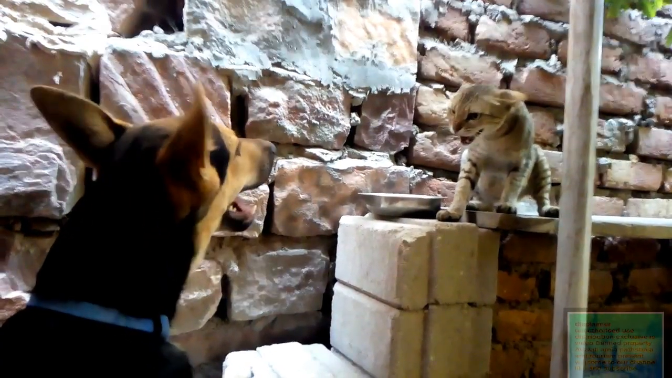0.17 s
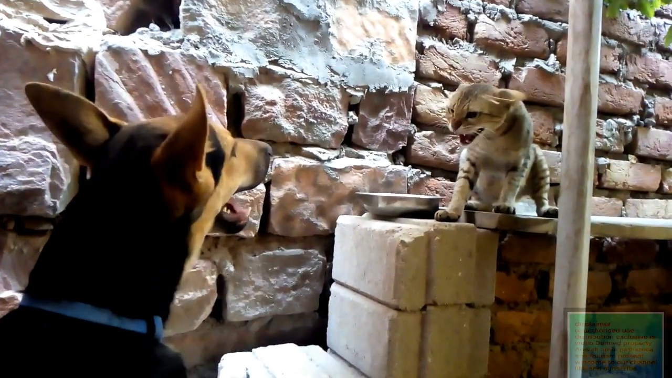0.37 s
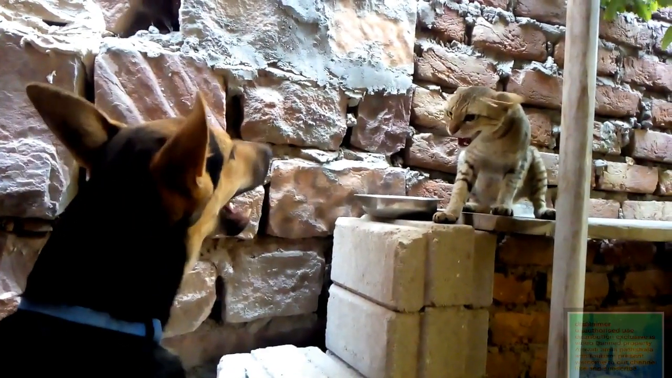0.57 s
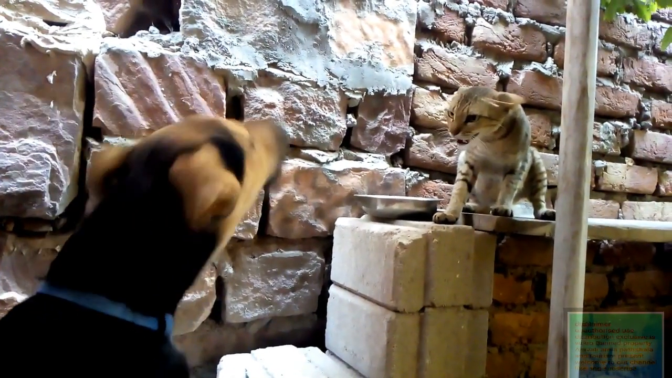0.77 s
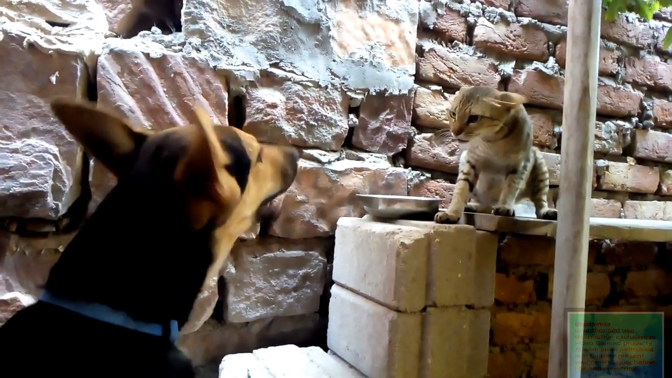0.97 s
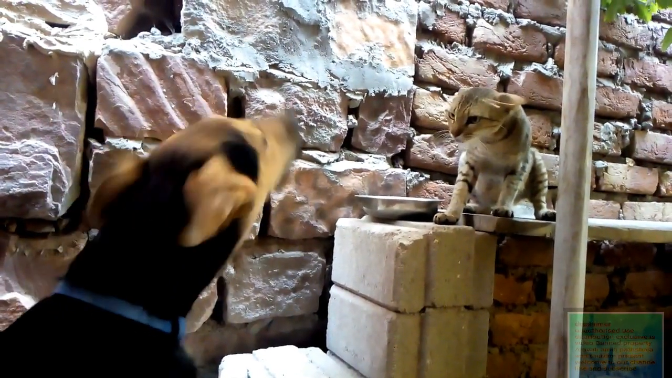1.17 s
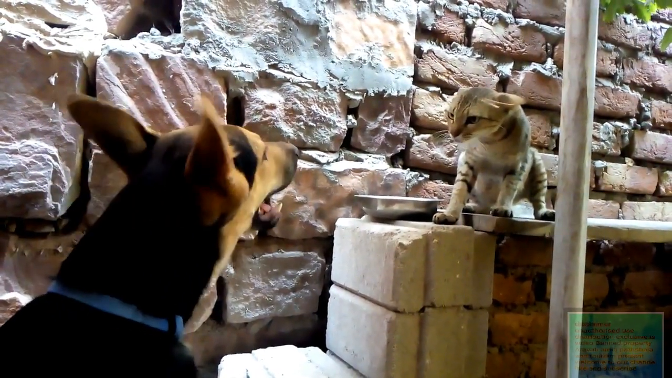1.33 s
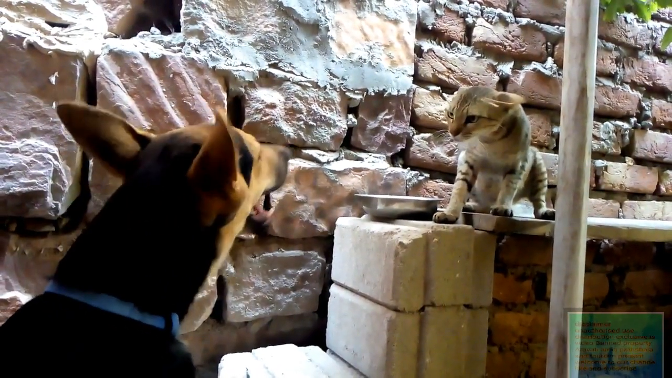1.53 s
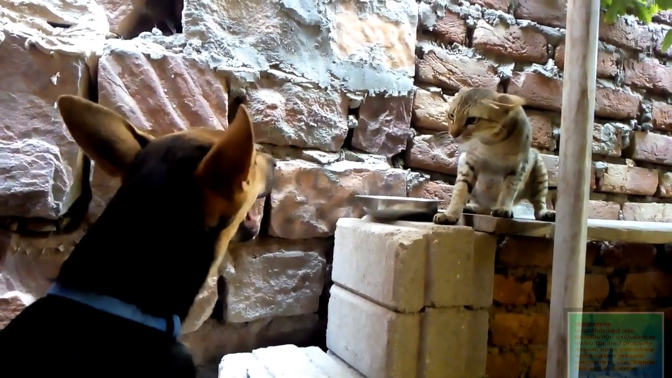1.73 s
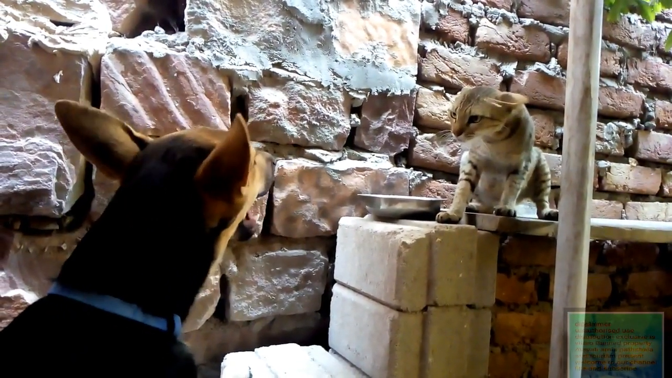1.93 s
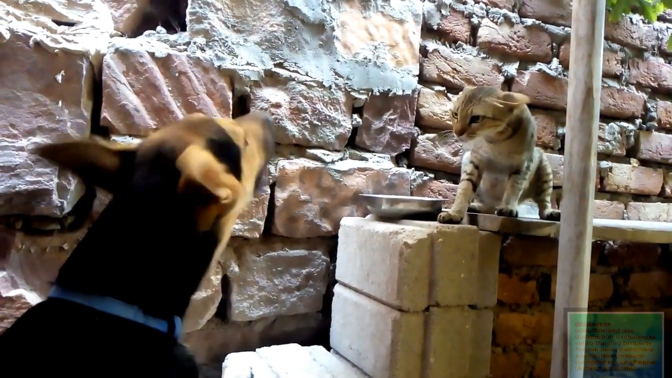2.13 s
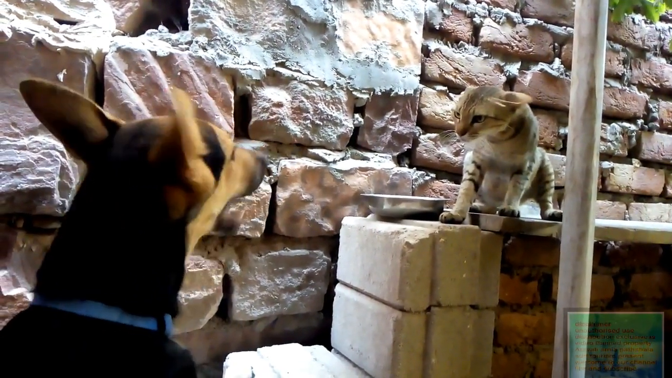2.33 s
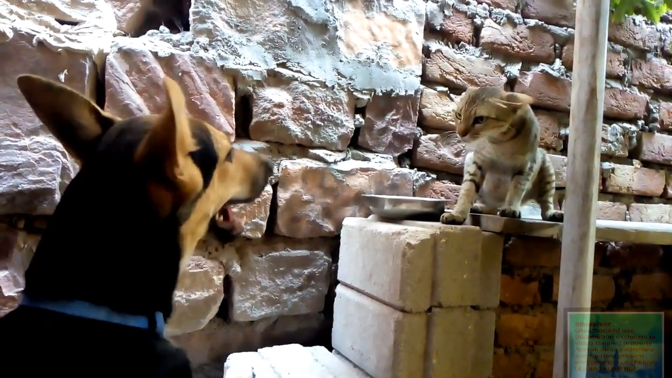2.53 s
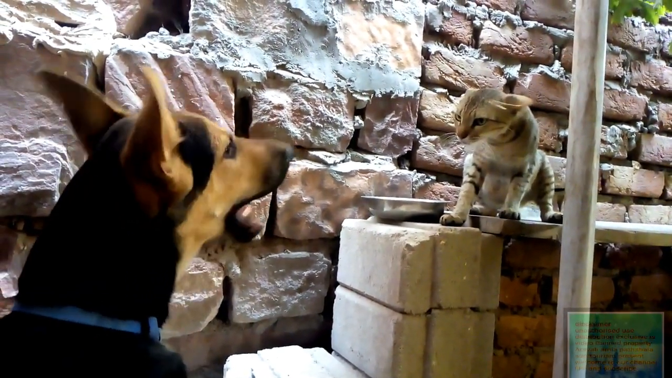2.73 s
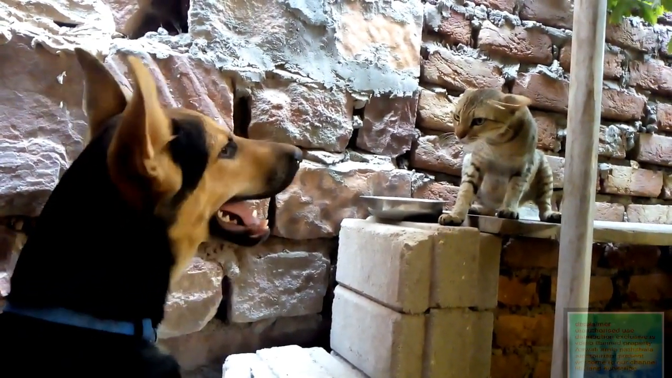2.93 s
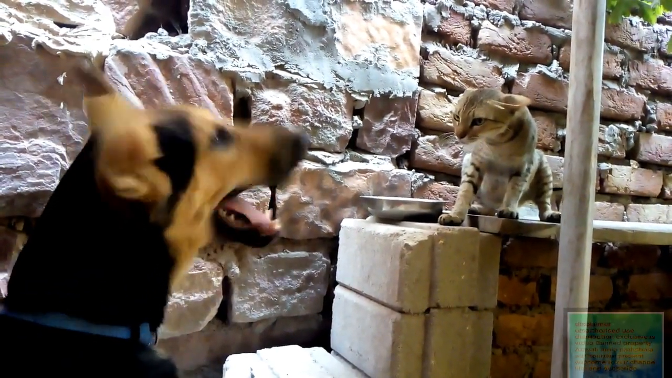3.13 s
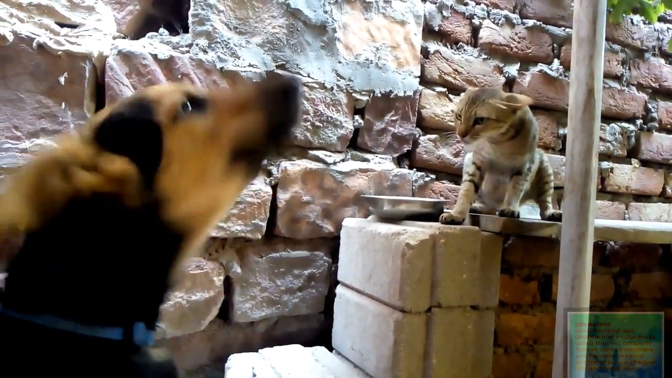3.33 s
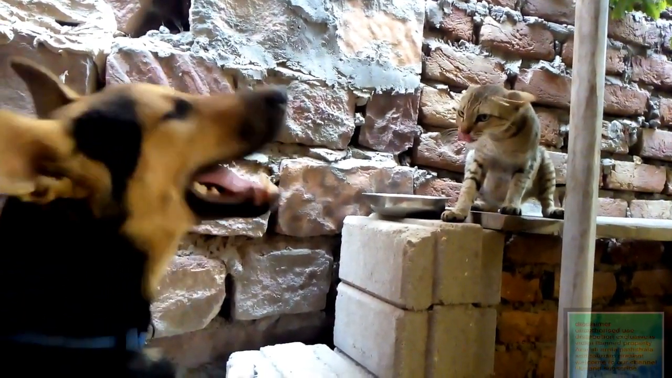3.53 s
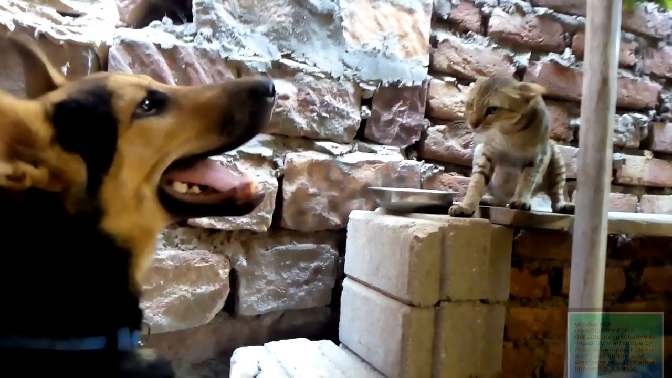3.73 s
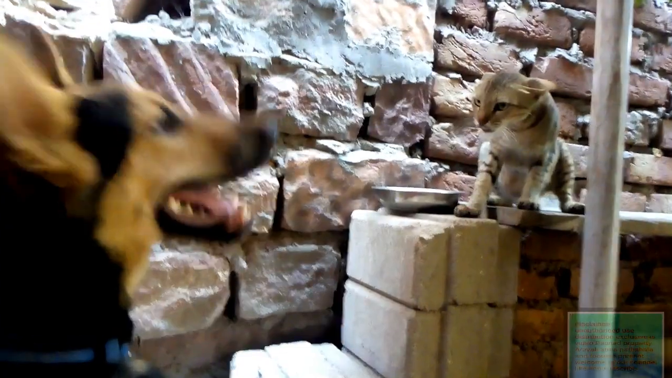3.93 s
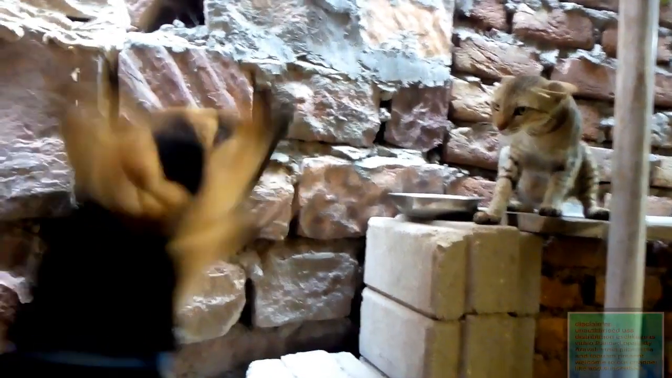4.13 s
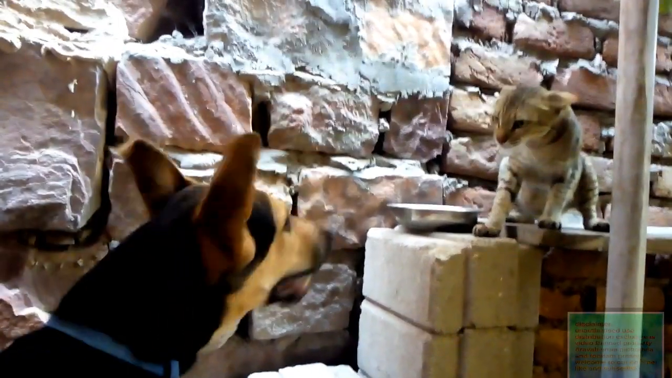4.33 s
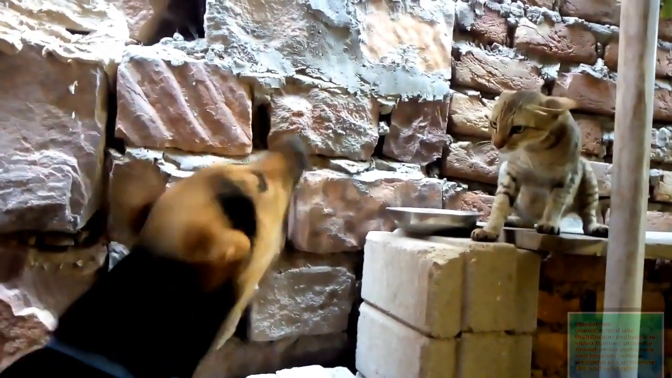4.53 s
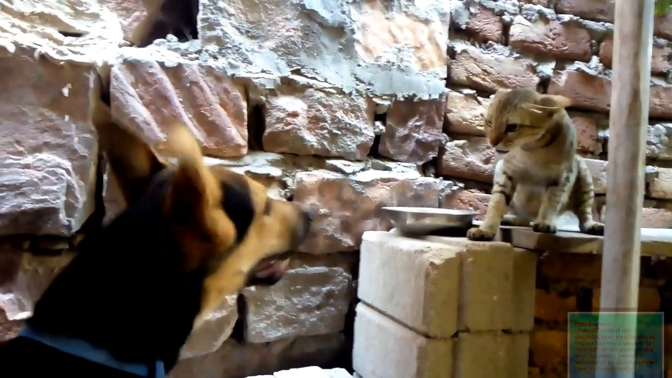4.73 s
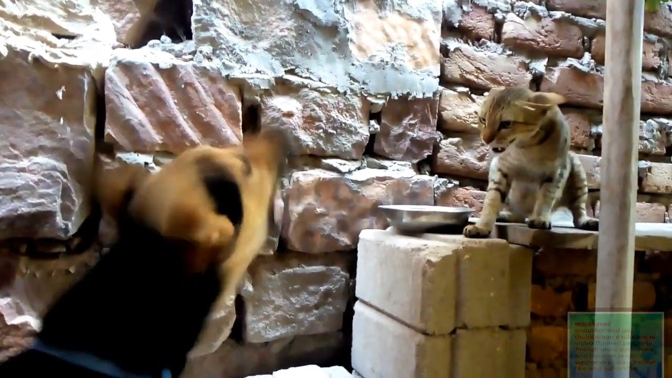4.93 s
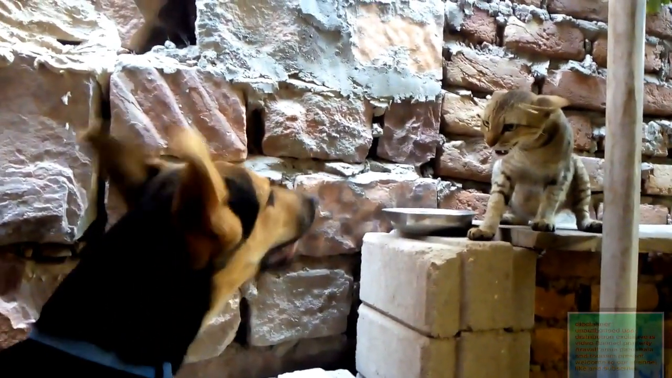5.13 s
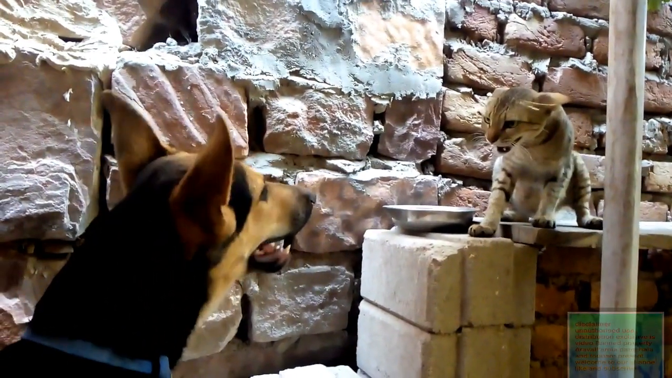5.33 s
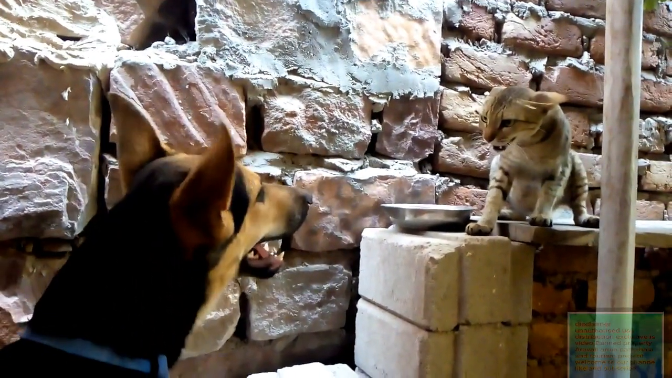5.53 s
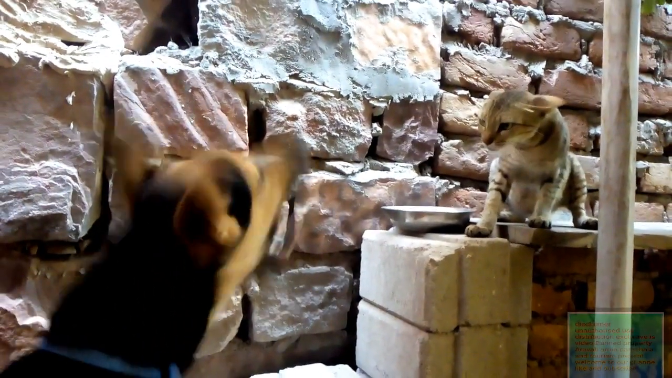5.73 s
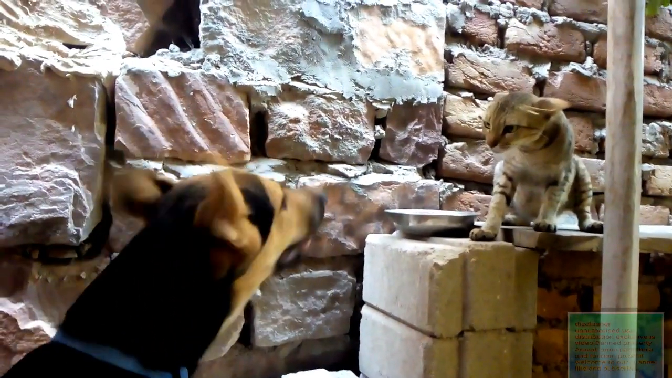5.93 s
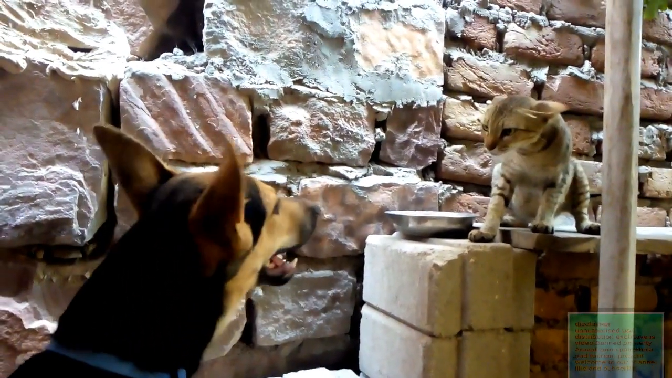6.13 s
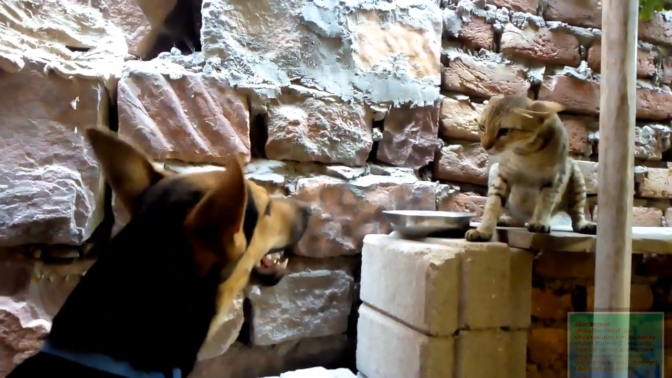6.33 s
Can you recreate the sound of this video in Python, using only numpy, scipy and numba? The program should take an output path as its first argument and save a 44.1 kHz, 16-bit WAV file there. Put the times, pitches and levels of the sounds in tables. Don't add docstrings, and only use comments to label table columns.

```python
import sys
import numpy as np
from scipy import signal
from scipy.fft import rfft, irfft
from scipy.io import wavfile
from scipy.ndimage import uniform_filter1d
from numba import njit

SR = 44100
rng = np.random.default_rng(int(sys.argv[2]) if len(sys.argv) > 2 else 0)


def elevation(decibels):
    levels = np.asarray(decibels, float)
    return 10 ** (levels / 20)


def persist_wave(psi):
    counts = np.round(np.clip(psi, -1, 1) * 32767).astype(np.int16)
    wavfile.write(sys.argv[1], SR, np.atleast_2d(counts).T)


N = 281358


def steep(x, hz, kind="low", order=4):
    return signal.sosfilt(signal.butter(order, hz, kind, fs=SR, output="sos"), x)


def rms_one(x):
    return x / np.sqrt(np.mean(x ** 2) + 1e-20)


def in_time(rows, t):
    s, *columns = np.transpose(rows)
    return [np.interp(t, s, c) for c in columns]


def at_hz(points, hz):
    points = np.array(points)
    return np.interp(np.log(hz), np.log(points[:, 0]), points[:, 1])


def wobble(size, hz):
    return rms_one(steep(rng.standard_normal(size + 4000), hz, order=2)[4000:])


def coloured(spectrum):
    # pitch_hz, likeness (0-1)
    likeness = [(60, 1), (300, 0.64), (640, 0.15), (1400, 0.096), (15000, 0)]
    hz = np.fft.rfftfreq(N, 1 / SR) + 1
    alike = np.clip(at_hz(likeness, hz), 0, 1)
    mid, side = rfft(rng.standard_normal((2, N))) * elevation(at_hz(spectrum, hz))
    return rms_one(irfft(np.sqrt(1 + alike) * mid + np.sqrt(1 - alike) * side * [[1], [-1]], N))


@njit
def resonate(x, hz, width_hz, rate):
    r = np.exp(-np.pi * width_hz / rate)
    y = np.zeros(len(x))
    for i in range(2, len(x)):
        drive = (1 - r * r) / 2 * (x[i] - x[i - 2])
        y[i] = drive + 2 * r * np.cos(2 * np.pi * hz[i] / rate) * y[i - 1] - r * r * y[i - 2]
    return y


def cavities(x, modes):
    out = np.zeros(len(x))
    for k, (hz, width_hz, level_db) in enumerate(modes):
        out += (-1) ** k * elevation(level_db) * resonate(x, np.full(len(x), 1. * hz), 1. * width_hz, SR)
    return out


def outdoor_hum():
    # pitch_hz, level_db (per Hz)
    hum_colour = [(25, -24.5), (45, -3.5), (130, 3), (180, -3), (275, -5.5), (615, -14.5), (930, -18.5),
                  (1100, -22.5), (2300, -24.5), (3300, -27), (6000, -34.5), (15500, -47)]
    # time_s, level_db
    hum_level = [(0, -58.5), (.5, -56), (1.5, -59), (3, -57.5), (3.7, -62.5), (5.3, -60), (6.38, -61)]
    level_db = in_time(hum_level, np.arange(N) / SR)[0]
    return elevation(level_db + 1.5 * wobble(N, 17)) * coloured(hum_colour)


def panting():
    # start_s, length_s, rise_share, level_db, nostril_hiss_db
    pants = [
        (0.05, 0.93, 0.039, -59.5, -100),
        (0.183, 0.43, 0.54, -68, -64.5),
        (1.658, 0.55, 0.061, -61.5, -94),
        (2.352, 0.06, .2, -60, -88),
        (3.751, 0.22, 0.28, -66, -61.5),
        (5.36, 0.25, 0.17, -58, -93),
        (6.349, 0.14, 0.2, -48, -64),
    ]
    # pitch_hz, level_db (per Hz)
    breath_colour = [(200, -13), (500, 12.5), (1200, 6), (2500, 1.5), (4000, -25), (7000, -27.5),
                     (9000, -43.5), (16000, -52.5)]
    t = np.arange(N) / SR
    air = coloured(breath_colour)
    hiss = rms_one(steep(steep(air, 4200, "high"), 8200))
    puffs = np.zeros((2, N))
    for start_s, length_s, rise, level_db, hiss_db in pants:
        peak_s = start_s + np.clip(rise, .05, .95) * length_s
        puff = np.interp(t, [start_s, peak_s, start_s + length_s], [0, 1, 0])
        puffs += puff * (elevation(level_db) * air + elevation(hiss_db) * hiss)
    return elevation(0.84 * wobble(N, 24)) * puffs


def voicing(curve, rough, chest_mouth, head_mouth, chest_throat_db, head_throat_db, rasp_db):
    register_hz = [510, 610]
    t = np.arange(curve[0][0], curve[-1][0], .001)
    since_s = t - t[0]
    share = since_s / (t[-1] - t[0])
    pitch, effort_db = in_time(curve, t)

    held_db = 20 * np.log10(uniform_filter1d(elevation(effort_db), size=int(0.023 * 1000) + 1))
    ring_on_db = .9 * np.clip(held_db - effort_db, -10, 20) * (share > .25) * (share < .85)

    climbing = np.interp(np.maximum.accumulate(pitch), register_hz, [.55, 1])
    roughness = climbing * np.interp(share, [.2, .4, 1], [.1, rough, 1.2 * rough])
    mouth_hz = pitch * np.interp(pitch, register_hz, [chest_mouth, head_mouth])
    throat_db = np.interp(pitch, register_hz, [chest_throat_db, head_throat_db])
    throat_db += np.interp(since_s, [0, 0.019], [-18.5, 0])
    rasp_swell_db = np.interp(since_s, [0, 0.06, 1.06], [-16, 0, -107.5])
    return np.transpose([t, pitch, effort_db, roughness, mouth_hz,
                         throat_db + ring_on_db, rasp_db + ring_on_db + rasp_swell_db])


def bark(rows, chest_hz, tongue_hz, tongue_db):
    # pitch_hz, width_hz, level_db
    throat = [(2089, 290, 3), (2432, 450, 2.5), (2727, 545, -1)]
    # pitch_hz, width_hz, level_db
    rasp = [(4000, 8100, -2), (6040, 3200, -23.5), (12000, 5200, -34)]
    mouth_width_hz, tongue_width_hz, muzzle_cut_hz = 463., 190, 2860
    first = int(rows[0][0] * SR)
    t = np.arange(first, int(rows[-1][0] * SR)) / SR
    pitch, effort_db, rough, mouth_hz, throat_db, rasp_db = in_time(rows, t)
    rough = np.clip(rough, 0, 1)

    shake = wobble(SR // 2, 130)[:len(t)]
    flutter = wobble(SR // 2, 110)[:len(t)]
    air = rng.standard_normal(SR // 2)[:len(t)]
    phase = 2 * np.pi * np.cumsum(pitch * (1 + .12 * rough * shake)) / SR
    k = np.arange(1, 31)[:, None]
    pulses = np.sum(np.cos(k * phase) * (k * pitch < .4 * SR), axis=0)
    pulses *= 1 + 0.95 * rough * flutter
    breath = 2.0 * np.sqrt(SR / 4 / pitch) * air * (.6 + 0.91 * np.cos(phase))
    source = (1 - rough) * pulses + rough ** 1.073 * breath

    detune = (k * pitch / mouth_hz - mouth_hz / (k * pitch)) * mouth_hz / mouth_width_hz
    even = np.sqrt(np.sum(1 / (1 + detune ** 2) ** 2, axis=0))
    once = resonate(source, mouth_hz, mouth_width_hz, SR)
    twice = resonate(once, mouth_hz, mouth_width_hz, SR)
    voice = (0.6 * twice + 0.32 * once) / even
    upper = [(tongue_hz, tongue_width_hz, tongue_db / 2)] + throat
    voice -= elevation(throat_db) * cavities(cavities(source, upper), upper)
    voice = steep(voice, muzzle_cut_hz, order=6)
    voice += elevation(rasp_db) * steep(cavities(source + 0.074 * breath, rasp), 5500, order=2)

    out = np.zeros(N)
    fade = np.clip((t[-1] - t) / .008, 0, 1)
    out[first:][:len(t)] = elevation(effort_db + 5) * voice * fade
    return steep(out, chest_hz, "high", order=2)


def barking_dog():
    # time_s, pitch_hz, effort_db
    yelps = [
        [(.518, 404.3, -54.5), (.533, 431.1, -33.5), (.536, 440, -23.5), (.545, 475, -19.5), (.565, 599, -13),
         (.585, 741.4, -7), (.61, 710, -4.5), (.645, 648.2, -9.5), (.67, 681, -37)],
        [(.943, 401, -47), (.953, 411.2, -22.5), (.965, 520, -20.5), (.997, 627.6, -7.5), (1.02, 668.8, -7),
         (1.058, 648, -7.5), (1.07, 621, -19), (1.09, 569, -52)],
        [(3.068, 421.8, -34.5), (3.085, 448.6, -23.5), (3.1, 469.4, -11.5), (3.112, 674.8, -28.5),
         (3.13, 808, -7), (3.155, 816.2, -11.5), (3.182, 751.7, -7), (3.19, 429, -23.5), (3.225, 421, -31.5)],
        [(5.608, 420.6, -48), (5.612, 412.8, -41.5), (5.622, 399.2, -63.5), (5.632, 419.8, -24.5),
         (5.648, 525.7, -17), (5.666, 766.8, -13.5), (5.71, 753.2, -5.5), (5.745, 645, -11),
         (5.765, 640, -28.5)],
    ]
    # time_s, pitch_hz, effort_db
    cracks = [
        [(4.029, 429, -36.5), (4.05, 463.3, -12.5), (4.07, 461.3, -19.5), (4.092, 482.7, -11),
         (4.106, 507.4, -15), (4.122, 621, -6.5), (4.14, 734, -12.5), (4.16, 717, -53.5)],
        [(4.402, 271.7, -34), (4.428, 337.7, -20), (4.44, 383.3, -29), (4.452, 424.2, -18),
         (4.47, 485.6, -13.5), (4.482, 500.6, -28.5), (4.486, 640.7, -5.5), (4.52, 623, -13.5),
         (4.538, 646, -46)],
        [(4.806, 282.8, -40), (4.823, 303, -14.5), (4.836, 346.9, -24.5), (4.852, 415.4, -16.5),
         (4.88, 497.2, -14.5), (4.887, 629, -5), (4.912, 652.2, -8.5), (4.94, 601, -20.5), (4.955, 557, -33)],
    ]
    # time_s, pitch_hz, effort_db
    grumbles = [
        [(1.969, 419.4, -32), (1.988, 440.2, -15), (2.01, 596.3, -21.5), (2.042, 620, -10.5),
         (2.056, 458, -20.5), (2.075, 422, -18.5), (2.15, 262.7, -25), (2.19, 140, -37.5), (2.32, 128, -61)],
        [(2.601, 371, -46.5), (2.615, 382.2, -27), (2.635, 398.7, -26.5), (2.66, 399.3, -23),
         (2.685, 363, -28.5), (2.72, 338, -53.5)],
    ]
    roughness = [.28, .05, .04, .3, .55, .3, .3, .26, .2]
    # mouth resonance over pitch in chest voice, in head voice,
    # chest_throat_db, head_throat_db, rasp_db
    manners = [(1.4, 1.04, -6.5, -11.5, -35), (0.76, .97, -5.5, -11, -36.5), (1.7, 1.04, -11.5, -8, -32),
               (1.25, 1.03, -4.5, -10, -29.5), (1.7, 1.02, -6.5, -11, -29), (1.8, 1.02, -0.5, -8, -26.5),
               (2.05, 0.87, -2.5, -16, -30.5), (1.746, 1.5, -13.5, -37, -36.5), (2.02, 1.9, -9, -7, -42)]
    # thrown_at_walls_db, chest_cutoff_hz, tongue_hz, tongue_db
    poses = [
        (0, 110, 1600, 2),
        (1, 150, 1980, 9),
        (1, 400, 1437, 8.5),
        (0.5, 190, 1370, 4.5),
        (0.5, 320, 1450, 7),
        (0.5, 380, 1300, 4.5),
        (0.5, 460, 1400, 2),
        (-27, 45, 4000, -4),
        (-38, 99, 1190, 10.5),
    ]
    barks = []
    for curve, rough, manner, pose in zip(yelps + cracks + grumbles, roughness, manners, poses):
        barks.append(bark(voicing(curve, rough, *manner), *pose[1:]))
    barks = np.array(barks)
    return barks.sum(axis=0), elevation(np.array(poses)[:, 0]) @ barks


def whining_cat():
    # time_s, pitch_hz, level_db
    whines = [
        [(1.3, 522.4, -58.5), (1.45, 539.5, -62), (1.6, 556, -57.5), (1.7, 562.3, -47.5), (1.8, 576.5, -53.5),
         (1.9, 582.6, -47.5), (1.97, 584, -52.5)],
        [(2.2, 505, -58), (2.3, 502, -59), (2.4, 482, -62), (2.62, 481, -59), (2.72, 445.4, -50.5),
         (2.83, 430.3, -53), (2.95, 444, -52), (3.07, 442.5, -51)],
        [(3.74, 500, -84.5), (3.8, 524, -70.5), (3.88, 523, -86.5)],
        [(6.0, 565, -60), (6.1, 587, -56), (6.2, 575, -53.5), (6.3, 585, -51), (6.38, 586, -43)],
    ]
    # throb depth (0-1) at start, at end, nasal_ring_db at start, at end
    moods = [
        (.05, 0.015, -9.5, 1),
        (.0, 0.18, 1, -20.5),
        (0.2, .2, -13, -26),
        (0.32, 0.12, -13, -24),
    ]
    # pitch_hz, level_db
    cat_throat = [(400, 14.5), (600, -1.5), (900, -9), (1150, -10.5), (1400, -25), (1750, -21.5),
                  (2400, -24), (2950, -17.5), (3500, -37), (4500, -49.5), (5500, -64.5), (7000, -73)]
    throb_hz, nasal_hz, nasal_width_hz, nasal_db = 47.5, 3950, 300, -6
    out = np.zeros(N)
    for rows, (throb_0, throb_1, ring_0_db, ring_1_db) in zip(whines, moods):
        start_s, end_s = rows[0][0], rows[-1][0]
        n = np.arange(int((start_s - .1) * SR), min(N, int((end_s + 0.032) * SR)))
        t = n / SR
        pitch, level_db = in_time(rows, t)
        throb, ring_db = in_time([(start_s, throb_0, ring_0_db), (end_s, throb_1, ring_1_db)], t)
        throb = np.clip(throb, 0, 1)
        phase = 2 * np.pi * np.cumsum(pitch * (1 + 0.0005 * wobble(N, 27)[n])) / SR
        k = np.arange(1, 13)[:, None]
        hz = k * pitch
        nasal = elevation(nasal_db + ring_db) / (1 + ((hz - nasal_hz) / nasal_width_hz) ** 2) ** 2
        muffle_db = -22 * throb * (hz > pitch)
        mouth = elevation(at_hz(cat_throat, hz) + muffle_db)
        stack = np.sum((mouth + nasal) * np.sin(k * phase), axis=0)
        left_s = t[-1] - t + (n[-1] == N - 1)
        gate = np.clip(np.minimum(t - t[0], left_s) / 0.02, 0, 1)
        swell = np.exp(1.7 * throb * np.sin(2 * np.pi * throb_hz * t))
        out[n] = np.sqrt(2) * elevation(level_db) * gate * swell * stack
    return out


def echoes(x, level_db, treble_t60_s):
    t = np.arange(len(level_db)) / SR
    shared, *own = rng.standard_normal((3, len(t)))
    apart = steep(np.array(own), 1300, "high", order=1)
    scatter = (0.5 * shared + apart) * elevation(level_db) * (t > .003)
    low = steep(scatter, 2750, order=2)
    response = low + (scatter - low) * elevation(-60 * t / treble_t60_s)
    response /= np.sqrt(np.sum(response ** 2) / 2)
    return signal.fftconvolve(x[None], response, axes=1)[:, :N]


def yard(animals, thrown):
    # delay_s, level_db
    wall_echo = [(.02, -8.5), (.05, -3.5), (.09, -7.5), (.14, -4), (.2, -14.5), (.24, -19.5), (.3, -36.5),
                 (.45, -54), (.8, -59)]
    # pitch_hz, level_db
    wall_colour = [(100, 5.5), (230, 15), (350, -4.5), (480, -2.5), (700, 1.5), (1000, -8.5), (1300, 0),
                   (1650, -5.5), (2050, 2), (2400, 4.5), (3300, -9.5), (6000, 5.5), (8000, -2),
                   (10000, -14.5), (16000, -21)]
    t = np.arange(int(.8 * SR)) / SR
    near = elevation(-10) * echoes(animals, -60 * t[:SR // 3] / 0.23, treble_t60_s=0.067)
    hz = np.fft.rfftfreq(N, 1 / SR) + 1
    tinted = irfft(rfft(thrown) * elevation(at_hz(wall_colour, hz)), N)
    return near + elevation(-9) * echoes(tinted, in_time(wall_echo, t)[0], treble_t60_s=0.97)


def scene():
    left_lead_s = .00016
    dog, thrown = barking_dog()
    cat = whining_cat()
    n = np.arange(N)
    direct = np.array([dog + cat, np.interp(n - left_lead_s * SR, n, dog + cat)])
    return direct + yard(dog + elevation(-2.5) * cat, thrown) + panting() + outdoor_hum()


def roll_off(x):
    return signal.sosfilt(signal.butter(12, 15800, fs=SR, output="sos"), x)


def record(dry):
    lopsided = [
        [.26],
        [.16],
    ]
    x = 0.96 * dry + np.array(lopsided) * dry ** 2
    x = x / (1 + np.abs(x / .74) ** 7.94) ** (1 / 6)
    x = steep(x, 23, "high", order=1) * elevation([[-4.5], [0]])
    return roll_off(x)


dry = scene()
out = record(dry)
persist_wave(out)
```